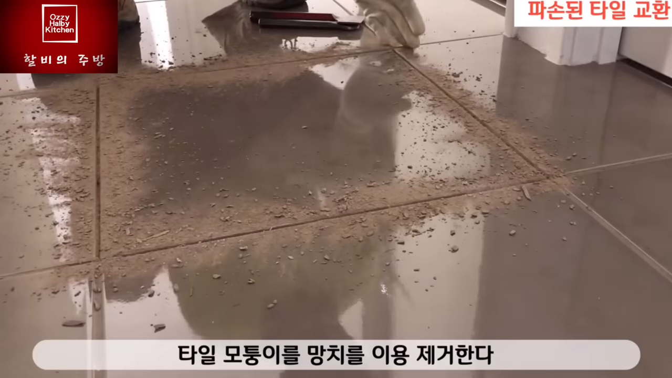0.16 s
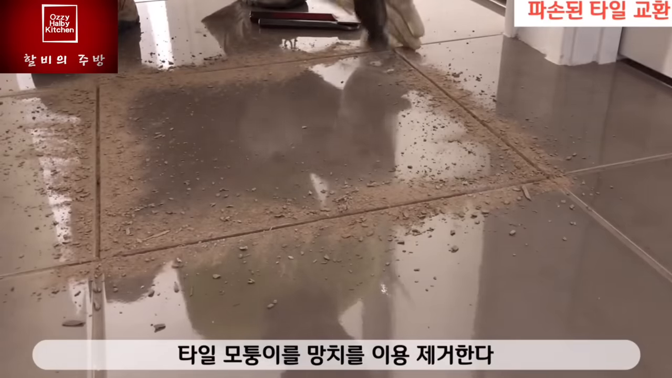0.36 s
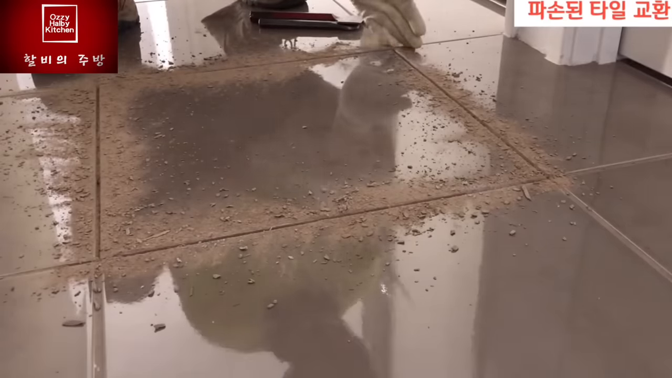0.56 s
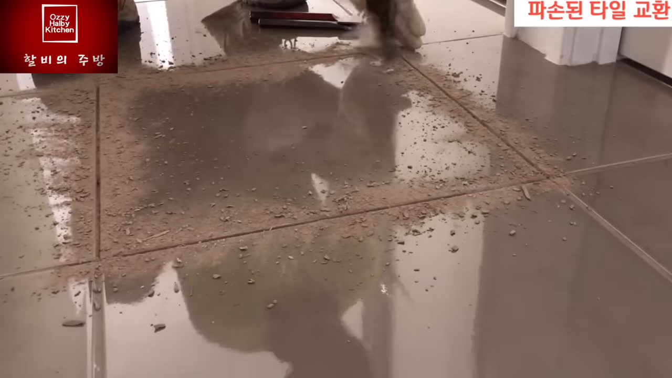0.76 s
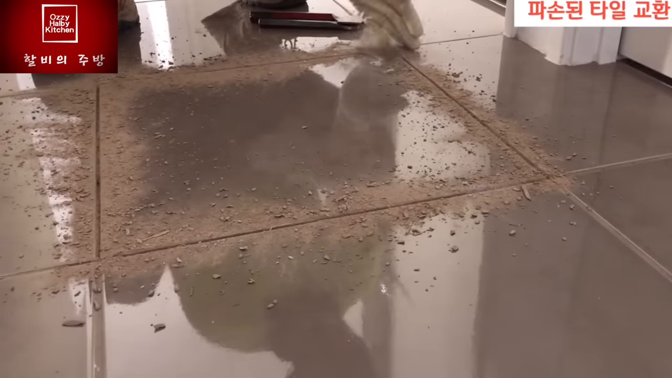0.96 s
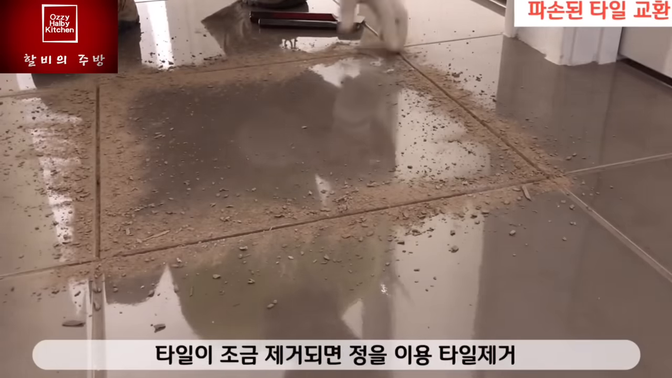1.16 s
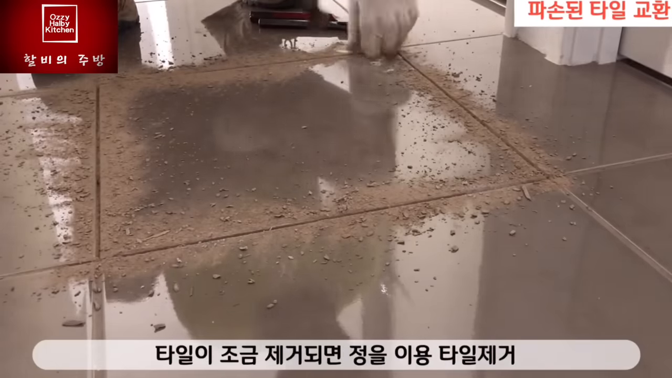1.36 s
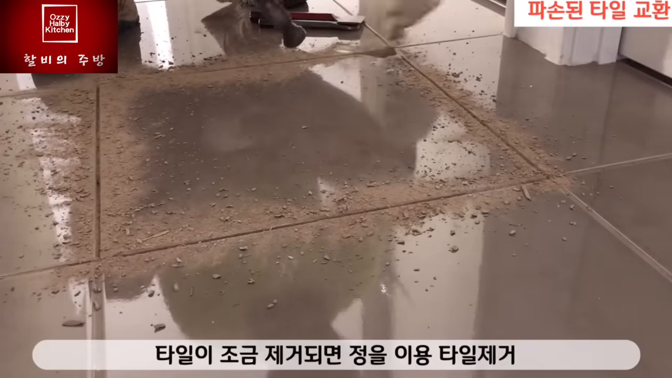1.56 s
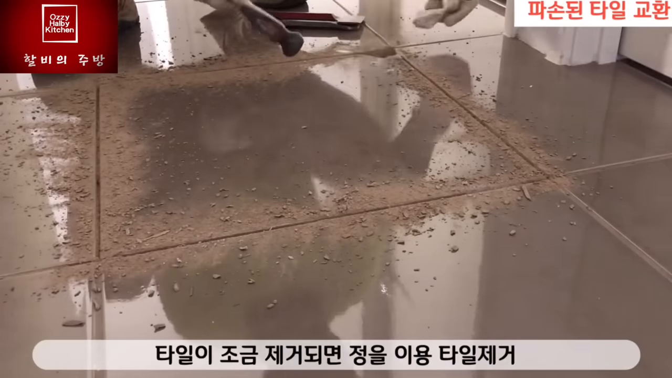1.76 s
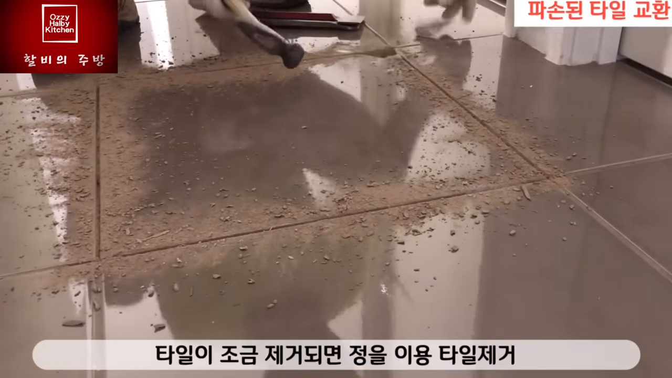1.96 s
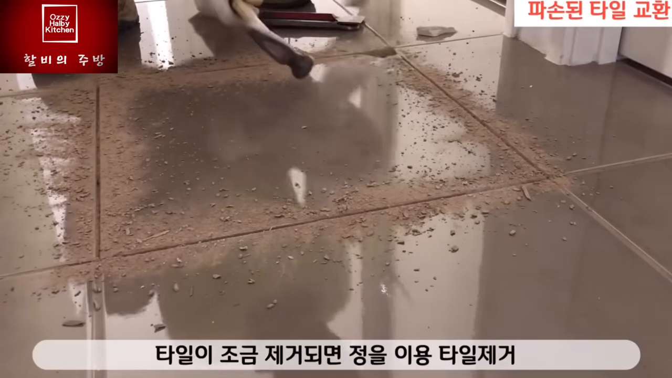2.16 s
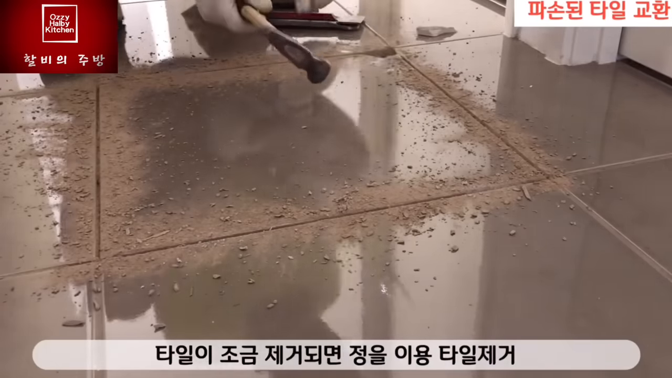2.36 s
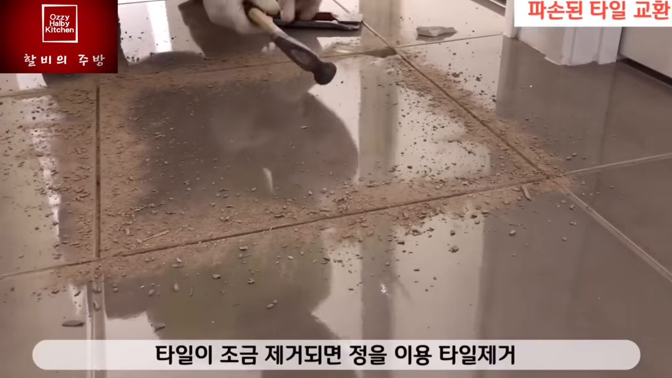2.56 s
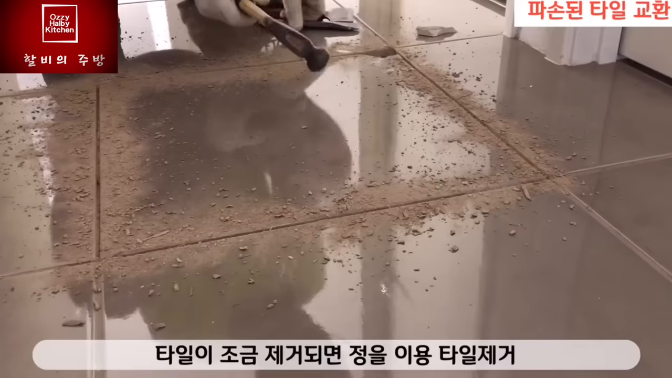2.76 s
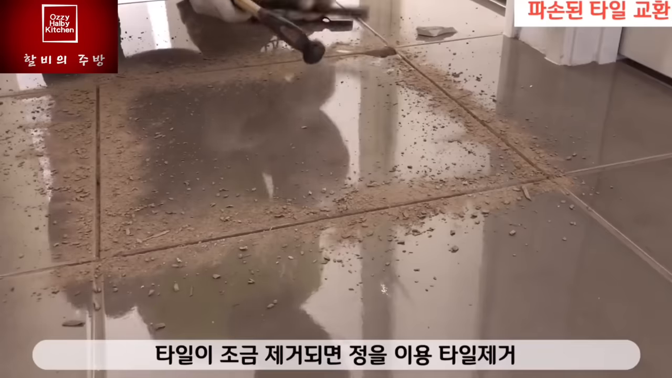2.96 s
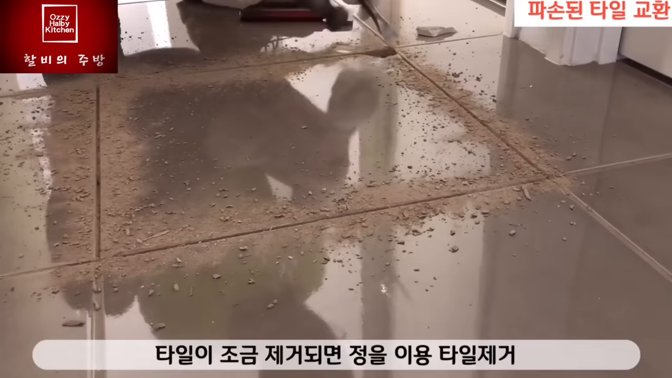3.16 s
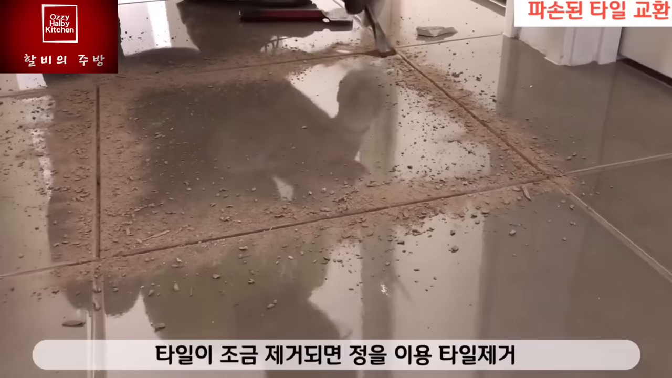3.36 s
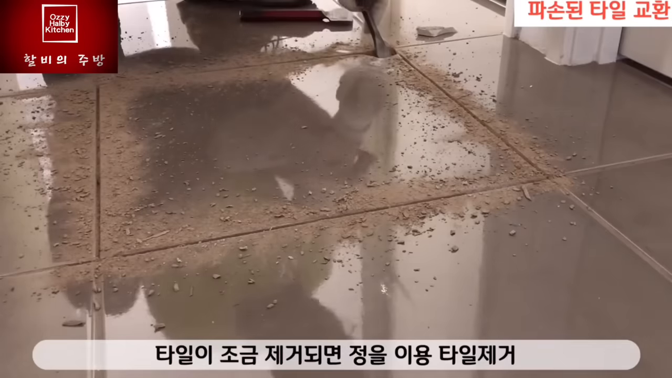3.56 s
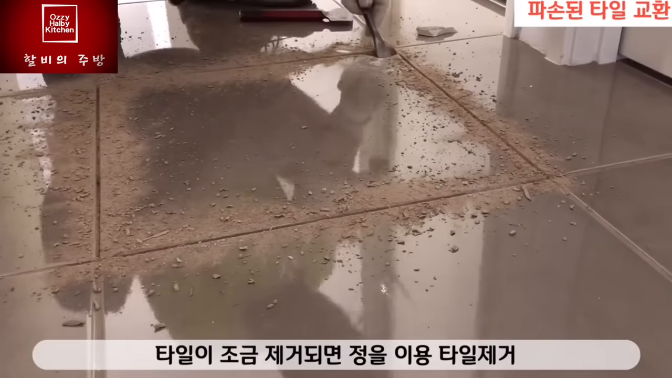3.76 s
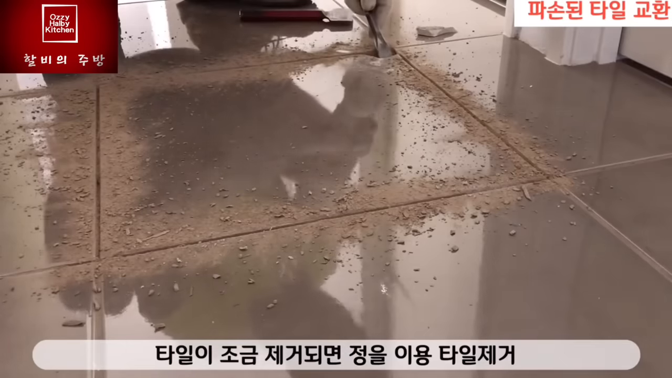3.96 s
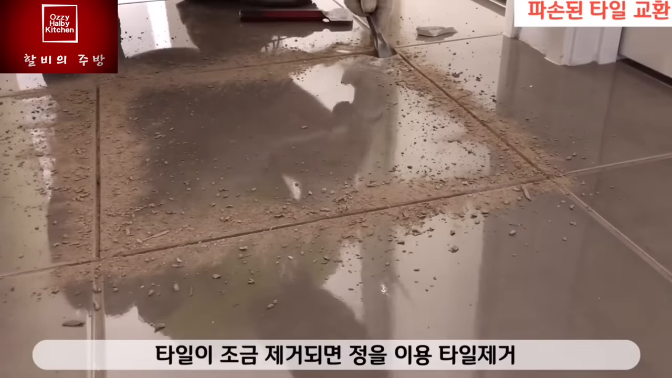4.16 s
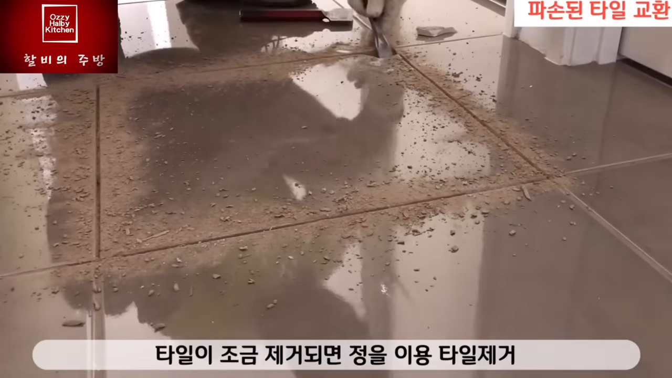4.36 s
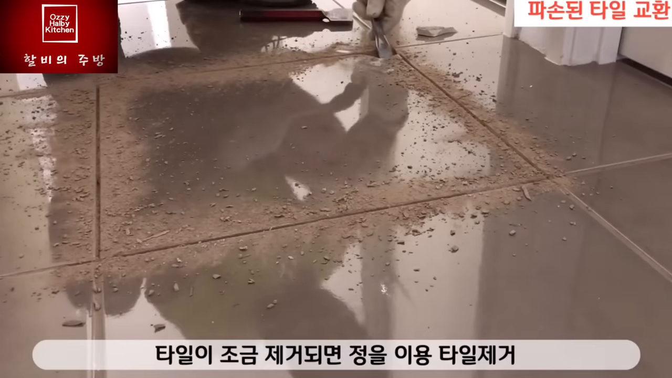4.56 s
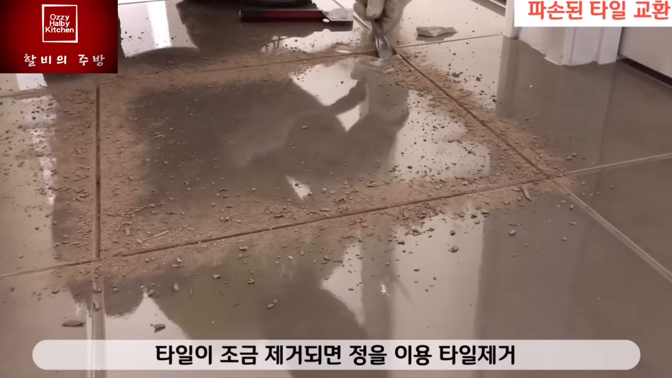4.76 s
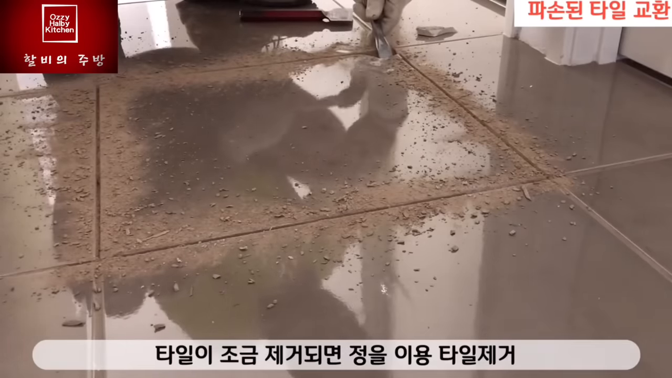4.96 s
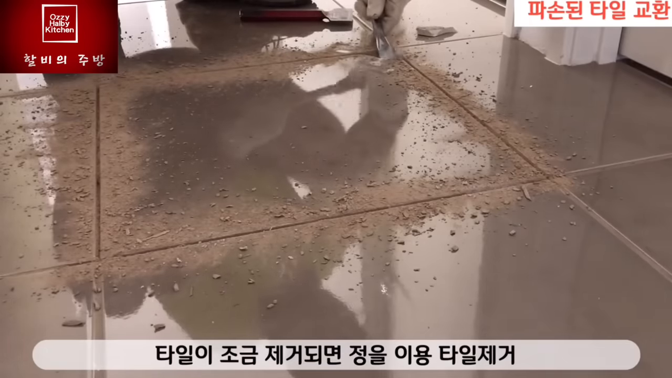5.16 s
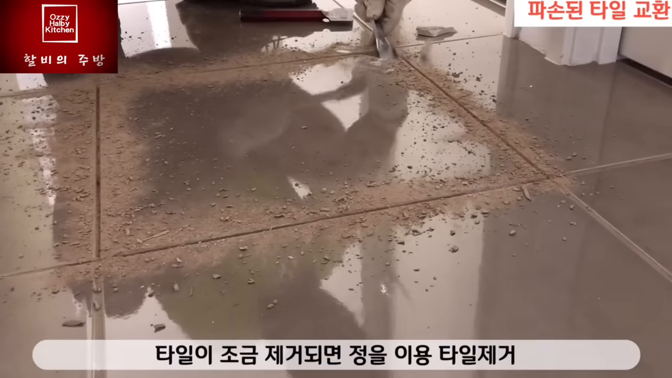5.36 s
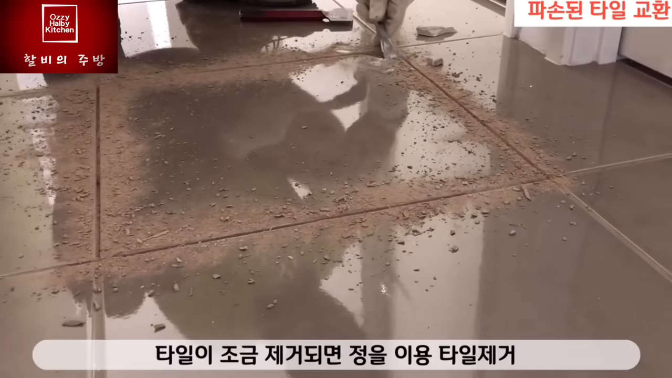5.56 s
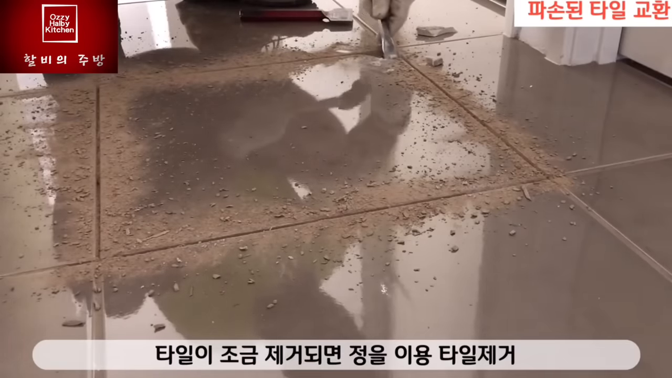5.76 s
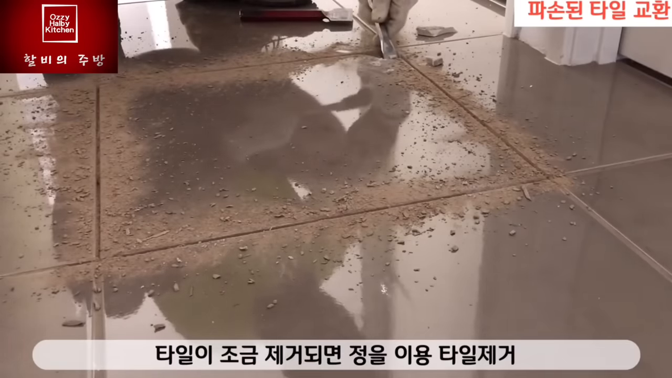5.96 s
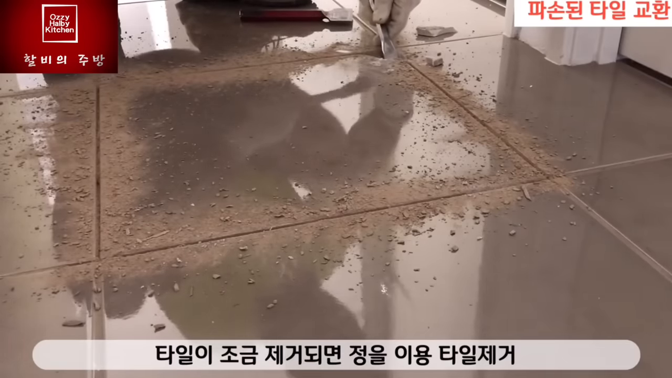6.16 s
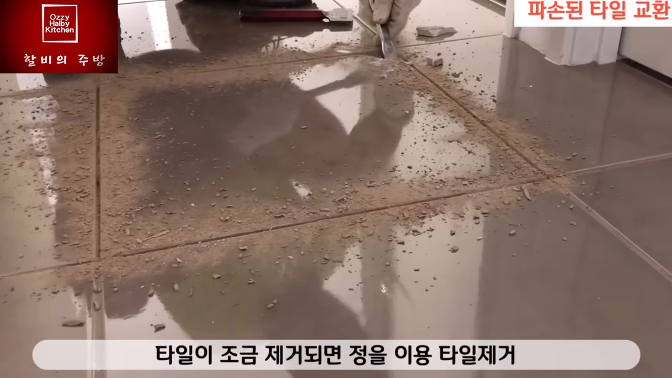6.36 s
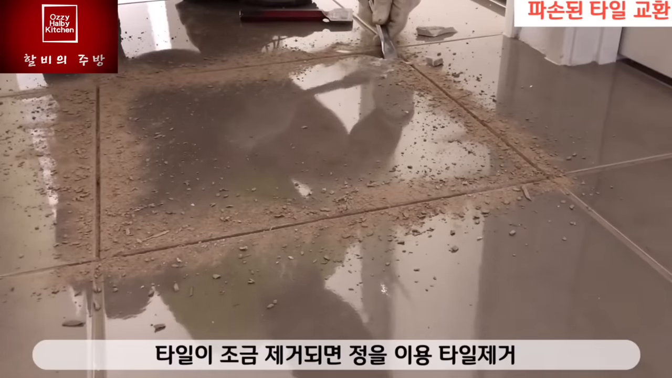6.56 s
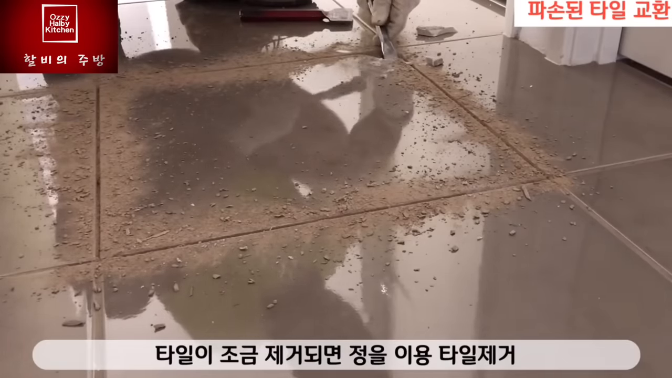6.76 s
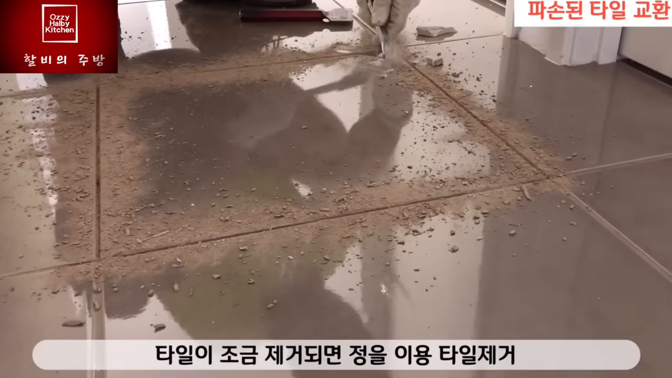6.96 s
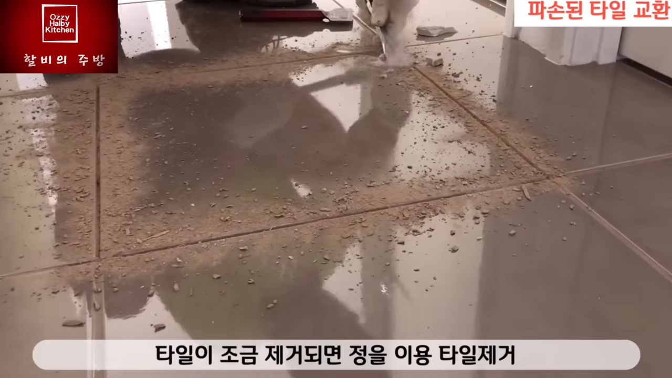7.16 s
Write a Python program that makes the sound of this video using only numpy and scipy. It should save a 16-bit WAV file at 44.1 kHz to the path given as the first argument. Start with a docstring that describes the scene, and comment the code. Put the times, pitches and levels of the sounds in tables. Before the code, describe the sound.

Hammer smashes a floor tile corner twice, a shard clinks, a chisel scrapes and rings, then bright chisel blows crack in an echoing bare room.

```python
"""A bare, echoing room, heard by one small microphone: a broken floor tile is knocked out over faint still air.
Hammer blows, shaped clicks with a steel ping and a hum, smash its corner; short snaps follow and a tossed shard clinks.
A steel chisel is dragged, its modes plucked by grit and ringing on, then seated in crunching dust made of tiny grains.
It is driven under the tile in runs of four and five bright blows, clicks coloured by steel and ceramic resonances.
Every blow excites the room; a limiter ducks each crack, so the room swells up just behind it."""
import sys
import numpy as np
from scipy import signal
from scipy.fft import rfft, irfft, next_fast_len
from scipy.io import wavfile

SR = 44100
rng = np.random.default_rng(int(sys.argv[2]) if len(sys.argv) > 2 else 0)


def dump(signal):
    """Clip the signal to [-1, 1] and save it as 16-bit WAV at the path in sys.argv[1]."""
    limited = np.clip(np.atleast_2d(signal).T, -1, 1)
    pcm = np.round(limited * 32767).astype(np.int16)
    wavfile.write(sys.argv[1], SR, pcm)


N = 318402
LEAD = SR // 2  # samples worked out before time zero, for the blow that falls there
TIME = np.arange(-LEAD, N) / SR
HZ = np.maximum(np.fft.rfftfreq(8192, 1 / SR), 1)  # frequency grid of every knock


def from_db(db):
    """Decibels to gain."""
    return 10 ** (np.asarray(db) / 20)


def rms_one(x):
    """Scale to rms 1."""
    return x / np.sqrt(np.mean(x ** 2) + 1e-20)


def at_hz(points, hz):
    """Read a table on a log-frequency axis."""
    known, value = np.transpose(points)
    return np.interp(np.log(np.maximum(hz, 1)), np.log(known), value)


def coloured(x, spectrum):
    """Give a steady sound a spectrum; rms 1."""
    size = next_fast_len(len(x))
    gain = from_db(at_hz(spectrum, np.fft.rfftfreq(size, 1 / SR)))
    return rms_one(irfft(rfft(x, size) * gain, size)[:len(x)])


def resonance(hz, width_hz, db):
    """Power response of one damped mode."""
    detuning = (HZ ** 2 - hz ** 2) / (HZ * width_hz)
    return from_db(db) ** 2 / (1 + detuning ** 2)


def ring(x, hz, t60):
    """A two-pole resonator: a unit click sets a sine of height 1 ringing, 60 dB down after t60 seconds."""
    radius = from_db(-60 / (t60 * SR))
    angle = 2 * np.pi * hz / SR
    return signal.lfilter([0, np.sin(angle)], [1, -2 * radius * np.cos(angle), radius * radius], x + 1e-18)


def knock(power, scatter_s):
    """Causal click with this power spectrum, smeared by waves that run to and fro in the struck piece."""
    # folding the cepstrum gives minimum phase: the energy comes as early as it can
    cepstrum = irfft(np.log(power + 1e-12) / 2)
    half = len(cepstrum) // 2
    folded = np.r_[cepstrum[0], 2 * cepstrum[1:half]]
    spectrum = np.exp(rfft(folded, 2 * half))
    # four all-pass echoes smear it in time and leave its colour alone
    feedback = np.sqrt(.5)
    for lag in scatter_s * rng.uniform(.1, 1, size=4):
        delay = np.exp(-2j * np.pi * HZ * lag)
        spectrum = spectrum * (delay - feedback) / (1 - feedback * delay)
    return irfft(spectrum)


def add(track, s, sound):
    """Mix a sound in at time s."""
    start = max(LEAD + round(s * SR), 0)
    track[start:start + len(sound)] += sound[:len(track) - start]


def grains(per_s, spread_db):
    """Random tiny contacts of uneven size and random sign."""
    chance = rng.random(len(TIME)) * SR / per_s
    at = np.flatnonzero(chance < 1)
    size_db = spread_db * np.minimum(-np.log(chance[at]), 4)
    out = np.zeros(len(TIME))
    out[at] = from_db(size_db) * (-1) ** at
    return out


def stroke(s, length_s, attack_s, release_s):
    """A movement of the hand swells in a straight line, holds and dies away exponentially."""
    swell = np.clip((TIME - s) / attack_s, 0, 1)
    return swell * np.exp(-np.maximum(TIME - s - length_s, 0) / release_s)


def body(power, thud_db, treble_db, thud_hz=600, treble_hz=8000):
    """Weight the power spectrum of a blow: the slab thuds, the glaze splinters."""
    thud = thud_db / (1 + (HZ / thud_hz) ** 4)
    treble = treble_db / (1 + (treble_hz / HZ) ** 6)
    return power * from_db(thud + treble) ** 2


# Still air of the room at the microphone. Each row: frequency in Hz, relative density in dB per Hz.
AIR_COLOUR = [(15, -36), (25, 0.5), (75, 5), (741, -11), (1240, -10.5), (1900, -17), (2120, -11.5),
              (2920, -19.5), (3630, -25.5), (6210, -23.5), (11200, -23), (14300, -28), (15500, -45)]


def still_air(level_db=-70):
    """Steady coloured noise lies under the work."""
    return from_db(level_db) * coloured(rng.standard_normal(len(TIME)), AIR_COLOUR)


# How long the bare room holds a sound. Each row: frequency in Hz, t60 in seconds.
ROOM_DECAY = [(100, 0.9), (260, 1.4), (700, 1.28), (1840, 1.31), (4850, .8), (9000, 0.65), (13000, 0.34)]
# Standing waves between the walls. Each row: frequency in Hz, starting level in the room response in dB.
WALL_MODES = [(83, -58), (160, -55), (187, -58.5), (259, -61), (376, -59.5), (428, -59.5), (504, -60.5),
              (680, -64), (757, -61), (1000, -63.5), (1088, -65.5), (1163, -64.5), (1277, -63.5)]


def standing_waves(t, swell_s=.02):
    """The strongest low modes of the room swell up and die slowly."""
    waves = 0
    for hz, db in WALL_MODES:
        fade = from_db(db - 60 * t / at_hz(ROOM_DECAY, hz))
        waves = waves + fade * np.sin(2 * np.pi * (hz * t + rng.random()))
    return waves * (1 - np.exp(-t / swell_s))


# First echoes, from the near wall and the ceiling. Each row: delay in seconds, level in dB against the source.
NEAR_ECHOES = [(.0125, -10.5), (.0155, -13.5), (.0275, -16)]


def first_echoes(t):
    """Hard walls send back distinct copies."""
    sample = np.arange(len(t))
    return sum(from_db(db) * (sample == round(s * SR)) for s, db in NEAR_ECHOES)


# Strength of the diffuse echo. Each row: frequency in Hz, level in dB against the sound sent into the room.
ROOM_LEVEL = [(40, 0.5), (75, 5.5), (120, -0.5), (200, 3.5), (320, -1), (420, 4.5), (1000, -0.5),
              (3000, -1), (9000, -3.5), (15000, -7.5)]


def room_echo(build_s=0.0058, early_db=0.5, early_t60=0.84, bass_lag_s=0.034, bass_hz=330):
    """Response of the room: strong early echoes from near walls, then a long tail; the bass builds up late."""
    t = np.arange(3 * SR // 2) / SR
    hz = np.fft.rfftfreq(len(t), 1 / SR)
    white = rfft(rng.standard_normal(len(t)))
    centres = np.geomspace(50, 16000, 18)
    tail = 0
    for centre, share in zip(centres, np.eye(len(centres))):
        # overlapping triangular bands, each with its own decay
        band = irfft(white * np.interp(hz, centres, share), len(t))
        fade = from_db(-60 * t / at_hz(ROOM_DECAY, centre))
        early = from_db(early_db - 60 * t / early_t60)
        build = build_s + bass_lag_s / (1 + (centre / bass_hz) ** 2)
        shape = fade * (1 + early) * (1 - np.exp(-(t / build) ** 2))
        tail = tail + band * shape / np.linalg.norm(shape) * from_db(at_hz(ROOM_LEVEL, centre))
    return tail + first_echoes(t) + standing_waves(t)


def tinkle(count=28, t60=0.12):
    """Chips of glaze tick at pitches of their own."""
    pitches = np.geomspace(2200, 15000, count) * rng.uniform(.95, 1.05, count)
    ticks = 0
    for hz in pitches:
        ticks = ticks + np.sqrt(hz) * ring(grains(per_s=35, spread_db=3.5), hz, t60)
    return rms_one(ticks)


# Blows with the hammer on the chisel; the notes shift with how the blade sits.
# Each row: start in seconds, force in dB, bite of the blade in dB, shank ring in dB, head ring in dB,
# tile note in Hz, its level in dB, bending note in Hz, its level in dB, chatter rate in Hz.
# The note and ring levels come before the force.
CHISEL_BLOWS = [(4.5376, 5, 0, 12.5, 13, 1120, 4, 3000, 2, 604),
                (4.7923, 13, 0, 15, 8, 1240, 4, 3270, 7, 1130),
                (5.0490, 14.5, -1.5, 16, 12.5, 1310, 3, 6070, 9, 1282),
                (5.3013, 13, -4.5, 14, 15.5, 2060, 0, 5870, 13, 746),
                (5.9598, 13, -7, 5.5, 4.5, 1840, -6, 3500, 13.5, 631),
                (6.2222, 14, 0.5, 9.5, -9, 4030, 7, 3590, 23, 2198),
                (6.4870, 17.5, 0.5, 8, 1, 2380, 4, 3590, 6.5, 2150),
                (6.7550, 16.5, 0, 13, -5, 1745, 8, 3420, 10, 1961),
                (7.0289, 16.5, -3.5, 15, 13, 1200, 4, 5680, 11, 1709)]
# Colour of the dust on the floor. Each row: frequency in Hz, gain in dB.
DUST_COLOUR = [(100, 5), (250, 4), (700, -2), (1500, 0.5), (2600, -2), (4400, -2), (7500, -7.5),
               (10000, -8.5), (11300, -2.5), (13000, -13.5), (16000, -9)]
# Moves of glove and blade in the dust.
# Each row: start in seconds, length in seconds, level in dB, tilt towards the treble in dB.
DUST_MOVES = [(1.175, .04, -60, 1), (1.278, .09, -59, -5), (1.4, .24, -72, 1), (2.12, .3, -73, -3),
              (2.87, .015, -60, 13), (3.33, 0.65, -70.5, 4), (3.448, 0.054, -65, -10), (3.738, .08, -70, 0),
              (4.127, .04, -68, -8), (4.29, .11, -64.5, 4), (5.79, .14, -65.5, 4)]
MOVE_ATTACK_S, MOVE_RELEASE_S = 0.027, 0.025
RESTING_DB = -80.5  # grit under the resting hand
SPRAY_DB, SPRAY_HOLD_S, SPRAY_FADE_S = -81, .15, .15  # dust thrown up by a blow of 0 dB force


def shuffle(split_hz=6000, tinkle_db=-3):
    """Dust crunches under each move of glove and blade, now dull, now fine, and patters after chisel blows."""
    crumble = rms_one(grains(per_s=3500, spread_db=4.0))
    dust = coloured(crumble + from_db(tinkle_db) * tinkle(), DUST_COLOUR)
    dull = signal.sosfiltfilt(signal.butter(2, split_hz, fs=SR, output="sos"), dust)
    fine = dust - dull
    spray = 0
    for s, force_db, *_ in CHISEL_BLOWS:
        patter = stroke(s, SPRAY_HOLD_S, MOVE_ATTACK_S, SPRAY_FADE_S)
        spray = spray + from_db(SPRAY_DB + force_db) * patter
    out = (from_db(RESTING_DB) + spray) * dust
    for s, length_s, db, tilt_db in DUST_MOVES:
        crunch = dull * from_db(-tilt_db / 2) + fine * from_db(tilt_db / 2)
        out = out + from_db(db) * stroke(s, length_s, MOVE_ATTACK_S, MOVE_RELEASE_S) * crunch
    return out


# Hand and tool settle on the floor. Each row: start in seconds, level in dB, pitch in Hz.
FLOOR_BUMPS = [(2.25, -21, 1200), (3.468, -21, 2200), (3.478, -13, 170), (3.775, -20, 200)]


def bumps():
    """Soft, dull contacts, each one broad resonance."""
    out = np.zeros(len(TIME))
    for s, db, hz in FLOOR_BUMPS:
        add(out, s, from_db(db) * knock(resonance(hz, hz, 0) ** 2, scatter_s=0.011))
    return out


# The tossed shard lands on the floor and rocks.
# Each row: start in seconds, level in dB, clack in Hz, clack width in Hz, ring in dB against the clack.
SHARD_CONTACTS = [(1.8291, -3.5, 3260, 2500, 5), (1.8424, -12, 3500, 3000, -1),
                  (1.909, -20, 6000, 2500, 10), (1.914, -2, 5800, 1080, 17.5),
                  (1.9245, -7.5, 5950, 1400, 18), (1.9405, -11, 5970, 1400, 4)]
SHARD_HZ, SHARD_WIDTH_HZ = 12600, 69
# Short snaps: crumbs, and the blade touching the tile just before a blow.
# Each row: start in seconds, level in dB.
SHORT_SNAPS = [(1.268, -20), (1.311, -18.5), (1.366, -22), (3.893, -20.5), (3.917, -25), (4.253, -25),
               (4.387, -29), (5.29, 2.5), (5.953, -15), (6.472, -4)]
SNAP_HZ, SNAP_WIDTH_HZ = 3940, 2750  # width before the response is squared


def debris(top_cut_hz=12800):
    """A shard clinks on the floor, a clack and a high ring; crumbs and blade snap, each a broad resonance."""
    out = np.zeros(len(TIME))
    top_cut = 1 / (1 + (HZ / top_cut_hz) ** 40)  # steep top cut on the shard's clink
    for s, db, hz, width_hz, ring_db in SHARD_CONTACTS:
        power = resonance(hz, width_hz, 0) + resonance(SHARD_HZ, SHARD_WIDTH_HZ, ring_db)
        add(out, s, from_db(db) * knock(power * top_cut, scatter_s=0.00083))
    for s, db in SHORT_SNAPS:
        snap = knock(resonance(SNAP_HZ, SNAP_WIDTH_HZ, 0) ** 2, scatter_s=.0025)
        add(out, s, from_db(db) * snap)
    return out


# The chisel touches down, slides lightly, catches as it is pressed, and is lifted.
TOUCH_S, PRESS_S, LIFT_S = 2.425, 2.535, 2.735
SLIDE_DB, PRESS_DB, CATCH_DB = -15, -18, -9
CATCH_FADE_S, DRAG_ATTACK_S, DRAG_RELEASE_S = 0.027, 0.022, 0.022


def rubbing():
    """How hard the dragged chisel bears on the floor."""
    slide = from_db(SLIDE_DB) * stroke(TOUCH_S, LIFT_S - TOUCH_S, DRAG_ATTACK_S, DRAG_RELEASE_S)
    press = from_db(PRESS_DB) * stroke(PRESS_S, LIFT_S - PRESS_S, DRAG_ATTACK_S, DRAG_RELEASE_S)
    catch = from_db(CATCH_DB) * stroke(PRESS_S, DRAG_ATTACK_S, DRAG_ATTACK_S, CATCH_FADE_S)
    return slide + press + catch


# Modes of the dragged chisel. Each row: frequency in Hz, level of the free ring in dB (rms if spread
# over sing_s), t60 in seconds, time in seconds at which the contact drives it hardest.
BAR_MODES = [(2122, -44, 0.43, 2.575), (3165, -43.5, 0.89, 2.71), (3600, -40, 0.7, 2.675),
             (3640, -43.5, 0.8, 2.662), (5320, -43, 0.92, 2.61), (6480, -49, 0.65, 2.517),
             (8660, -55.5, 0.48, 2.55), (9080, -61, 0.3, 2.53), (9560, -56, 0.55, 2.53),
             (10820, -63.5, 0.8, 2.49), (14290, -70, .3, 2.5), (14950, -70, 0.32, 2.52)]
# Colour of the scrape on the floor. Each row: frequency in Hz, gain in dB.
RASP_COLOUR = [(80, -48), (300, -20), (800, -8), (1080, -2), (1350, 7), (1700, -16), (3500, 5.5),
               (4700, -8), (5600, 0), (7500, -15), (9400, -4), (12000, -36), (16000, -26)]
PASS_SHARE = 0.43  # the chisel slows: a mode is driven for this share of the time slid so far
EVEN_SHARE = .03  # part of the plucking that reaches every mode alike
FLICK_DB, FLICK_S = -21, .01  # the edge flicks every mode as it leaves the floor


def drag(sing_s=0.23, rasp_db=-44.5, pressed_db=-7, pressed_t60=0.14):
    """Grit plucks the sliding bar, which rings on once it is lifted; returns rasp and ring."""
    rub = rubbing()
    grit = grains(per_s=2500, spread_db=5.0)
    flick = from_db(FLICK_DB) * stroke(LIFT_S, FLICK_S, FLICK_S, FLICK_S)
    sing = 0
    for hz, db, t60, s in BAR_MODES:
        # the contact point wanders along the bar
        passing = 1 / (1 + ((TIME - s) / (PASS_SHARE * (s - TOUCH_S))) ** 2)
        plucks = grit * (rub * (EVEN_SHARE + passing) + flick)
        free = ring(plucks, hz, t60)
        pressed = ring(plucks, hz, pressed_t60)  # touching the floor smears each mode
        mode = free / np.linalg.norm(free) + from_db(pressed_db) * pressed / np.linalg.norm(pressed)
        sing = sing + from_db(db) * mode * np.sqrt(sing_s * SR)
    rasp = from_db(rasp_db) * rub * coloured(grains(per_s=2200, spread_db=5.0), RASP_COLOUR)
    return rasp, sing


# Ringing of the tile under the chisel. Each row: frequency in Hz, width in Hz, level in dB,
# the frequency and level before each blow's small random shift.
TILE_MODES = [(387, 140, -8), (780, 43, -6.5), (1010, 130, -7.5), (1227, 93, 1), (1700, 110, 0),
              (2140, 200, 0.5), (2660, 210, -1), (3080, 180, 0), (3604, 140, 4), (4180, 250, 5),
              (4660, 69, 4), (5510, 140, 4), (7650, 200, -4), (10950, 320, -6)]


def tile(vary_db=0.5, vary_share=0.036):
    """Each chisel blow finds the cracking tile held a little differently, so its modes shift."""
    power = 0
    for hz, width_hz, db in TILE_MODES:
        pitch_chance, level_chance = rng.standard_normal(2)
        power = power + resonance(hz * (1 + vary_share * pitch_chance), width_hz, db + vary_db * level_chance)
    return power


def rebound(chatter_hz, rebound_db=-11):
    """Power response of a second, weaker contact, one chatter period after the first."""
    gain = from_db(rebound_db)
    return 1 + 2 * gain / (1 + gain ** 2) * np.cos(2 * np.pi * HZ / chatter_hz)


# Colour of a chisel blow. Each row: frequency in Hz, gain in dB.
CUT_COLOUR = [(40, -42), (90, -20), (160, -9.5), (400, -10), (700, -8.5), (1150, -9), (1600, -4.5),
              (4200, -7.5), (5100, -6.5), (6200, 4), (8000, -0.5), (10300, -1), (13000, -7), (16000, -26)]
SHANK_HZ, SHANK_WIDTH_HZ = 9355, 245
HEAD_HZ, HEAD_WIDTH_HZ = 15380, 150
TILE_NOTE_WIDTH_HZ = 190
BEND_WIDTH_HZ, BEND_NARROWS = 300, .42  # the freer the blade, the louder and narrower its note
# the second bending note; a higher bend has less of it
OVERTONE_RATIO, OVERTONE_LOSS_DB_PER_HZ = 1.92, .0011
SPLINTER_PER_BITE = 1.4  # dB of treble for each dB of thud


def chisel():
    """Bright blows; a deep bite thuds and splinters more, and hand and tile keep the steel's ring short."""
    out = np.zeros(len(TIME))
    for (s, force_db, bite_db, shank_db, head_db,
         note_hz, note_db, bend_hz, bend_db, chatter_hz) in CHISEL_BLOWS:
        shank = resonance(SHANK_HZ, SHANK_WIDTH_HZ, shank_db)
        head = resonance(HEAD_HZ, HEAD_WIDTH_HZ, head_db)
        width_hz = BEND_WIDTH_HZ * from_db(-BEND_NARROWS * bend_db)
        overtone_db = bend_db - OVERTONE_LOSS_DB_PER_HZ * bend_hz
        bends = resonance(bend_hz, width_hz, bend_db)
        bends = bends + resonance(OVERTONE_RATIO * bend_hz, width_hz, overtone_db)
        cut = from_db(at_hz(CUT_COLOUR, HZ)) ** 2
        note = resonance(note_hz, TILE_NOTE_WIDTH_HZ, note_db)
        ceramic = body(cut + tile() + note, bite_db, SPLINTER_PER_BITE * bite_db)
        power = (ceramic + bends) * rebound(chatter_hz) + shank + head
        add(out, s, from_db(force_db) * knock(power, scatter_s=0.00076))
    return out


# Hammer straight on the tile; the first blow falls before time zero and only its aftermath is heard.
# Each row: start in seconds, force in dB, thud in dB, treble in dB, ring of the hammer head in dB before force.
HAMMER_BLOWS = [(-.19, 27.5, -0.5, -8, -10), (0.1922, 29.5, -2, -1.5, -4), (0.596, 23, 3.5, 2, -5)]
# Colour of a hammer blow. Each row: frequency in Hz, gain in dB.
SMASH_COLOUR = [(40, -30.5), (85, -13.5), (160, -8.5), (400, -4.5), (1100, 0), (2500, -0.5), (4200, -7.5),
                (7500, -14.5), (10500, -17.5), (13000, -23), (16000, -25)]
HUM_HZ, HUM_T60 = 500.6, 2.3  # pitch in Hz, t60 in seconds
HUM_DB = -69.5  # for a blow of 0 dB force


def hammer():
    """Heavy, dull blows on the tile, with a short steel ping; returns them and a faint lingering hum."""
    out, jolts = np.zeros((2, len(TIME)))
    for s, force_db, thud_db, treble_db, ring_db in HAMMER_BLOWS:
        smash = body(from_db(at_hz(SMASH_COLOUR, HZ)) ** 2, thud_db, treble_db)
        ping = resonance(hz=9520, width_hz=160, db=ring_db)
        add(out, s, from_db(force_db) * knock(smash + ping, scatter_s=.0016))
        add(jolts, s, from_db([force_db]))
    return out, from_db(HUM_DB) * ring(jolts, HUM_HZ, HUM_T60)


def scene(direct_low_hz=560, low_cut_hz=40):
    """All the work sounds through the room, over faint still air."""
    air = still_air()
    small = debris()
    rasp, sing = drag()
    blows, hum = hammer()
    work = blows + chisel() + rasp + shuffle() + bumps()
    # the small contact radiates little bass; the bass arrives by way of slab and room
    direct = signal.sosfilt(signal.butter(2, direct_low_hz, "high", fs=SR, output="sos"), work)
    into_room = work + from_db(0.5) * small + from_db(-4.5) * sing
    echo = signal.fftconvolve(into_room, room_echo())[:len(TIME)]
    heard = direct + small + sing + hum + echo + air
    # a small microphone is deaf to the deepest bass
    low_cut = signal.butter(4, low_cut_hz, "high", fs=SR, output="sos")
    return signal.sosfilt(low_cut, heard)[None, LEAD:]


def limiter(x, ceiling_db=-10.5, release_db_per_s=650, attack_s=0.00024):
    """The gain drops almost at once on a peak and climbs back within tens of milliseconds."""
    over_db = np.maximum(20 * np.log10(np.abs(x) + 1e-9) - ceiling_db, 0)
    # a running maximum against a slope holds each peak and lets it go at a constant rate
    slope = release_db_per_s * np.arange(N) / SR
    held_db = np.maximum.accumulate(over_db + slope, axis=-1) - slope
    smoothing = np.exp(-1 / (attack_s * SR))
    return x * from_db(-signal.lfilter([1 - smoothing], [1, -smoothing], held_db))


def record(dry, top=.38, cutoff_hz=15900):
    """Limiter, rounding of what slips through it, and a steep top cut."""
    limited = limiter(dry)
    rounded = limited / (1 + (limited / top) ** 4) ** (1 / 4)
    return signal.sosfiltfilt(signal.ellip(8, .1, 40, cutoff_hz, fs=SR, output="sos"), rounded)


dry = scene()
out = record(dry)
dump(out)
```